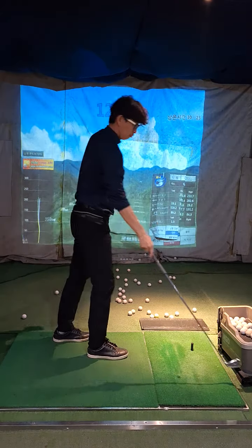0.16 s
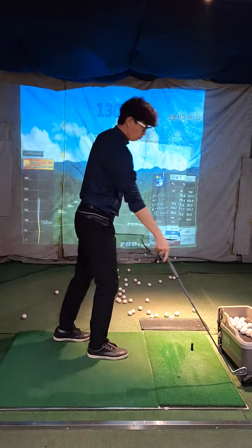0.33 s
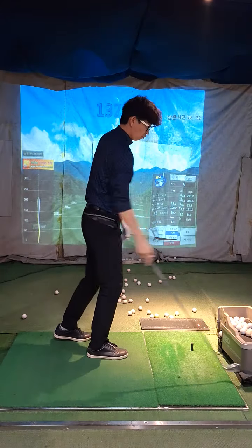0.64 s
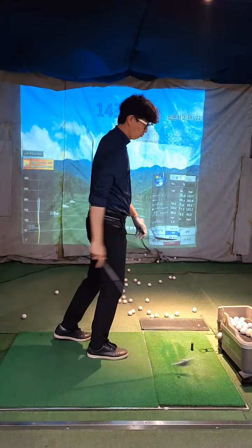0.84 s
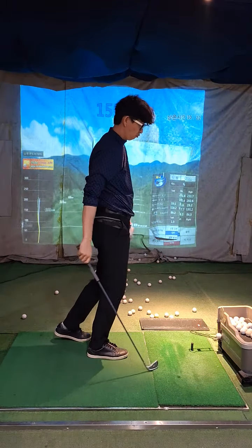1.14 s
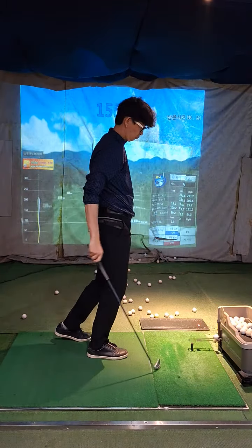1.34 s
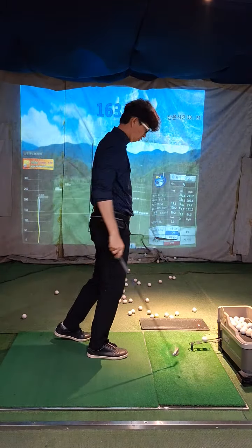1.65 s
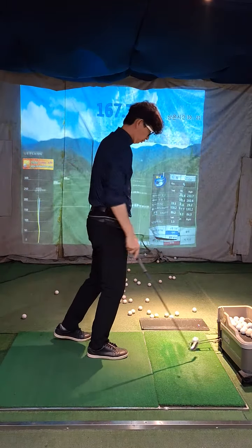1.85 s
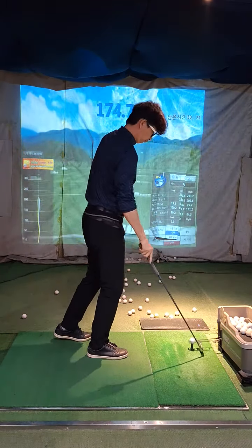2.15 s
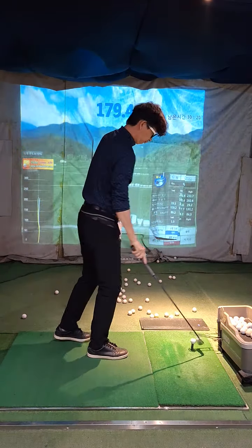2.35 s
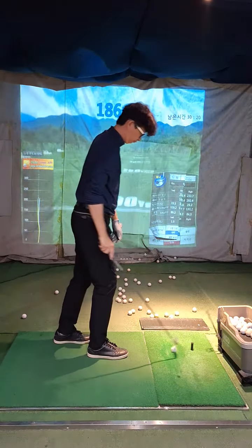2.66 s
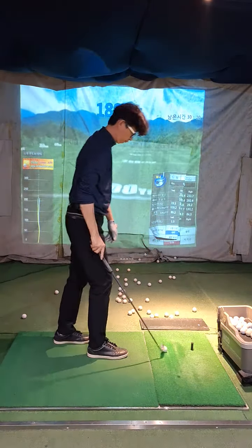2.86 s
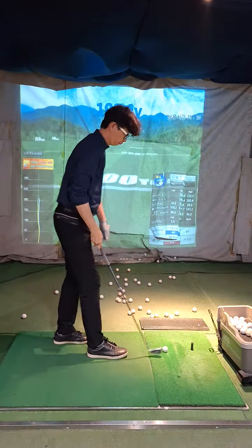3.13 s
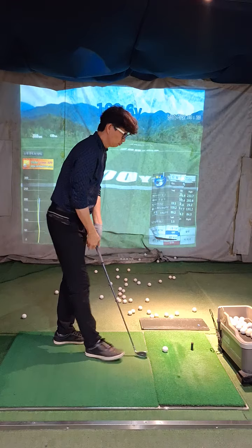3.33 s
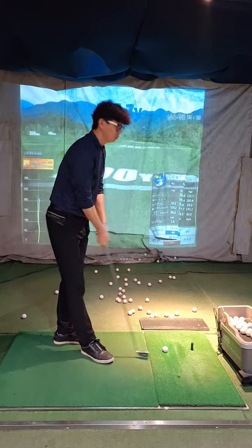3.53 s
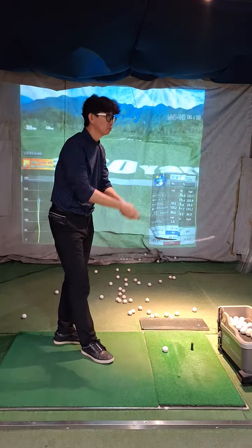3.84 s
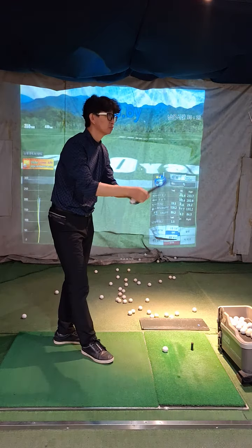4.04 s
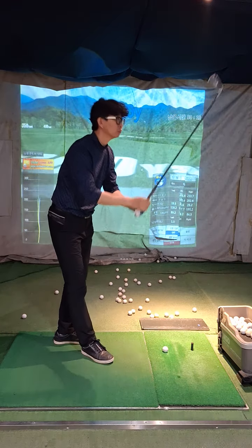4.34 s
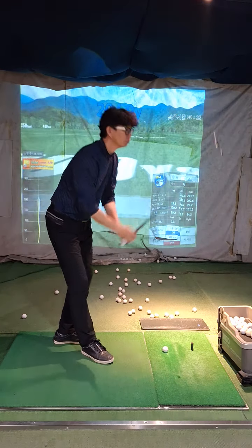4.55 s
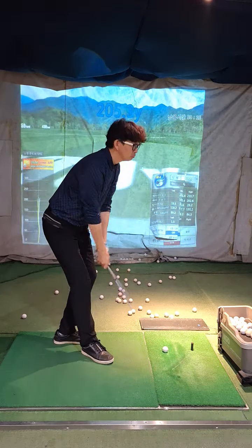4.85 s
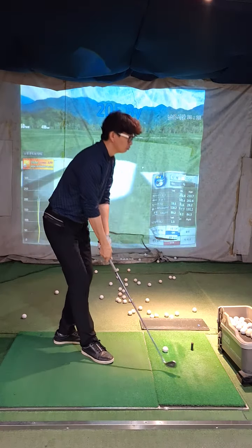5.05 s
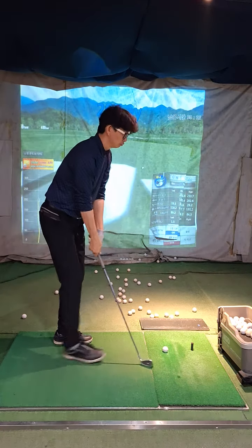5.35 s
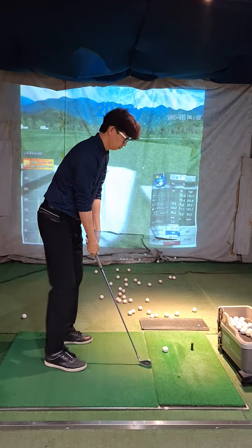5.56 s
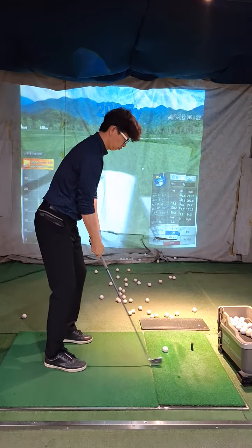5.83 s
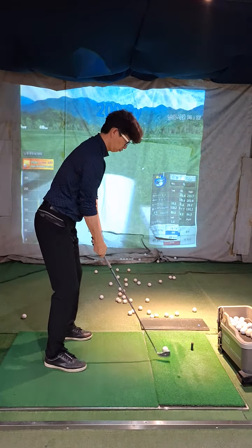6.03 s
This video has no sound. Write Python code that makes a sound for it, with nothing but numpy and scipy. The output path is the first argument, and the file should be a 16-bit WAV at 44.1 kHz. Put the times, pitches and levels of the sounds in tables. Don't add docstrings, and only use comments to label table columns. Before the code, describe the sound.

A low ventilation rumble with mains hum and a slowly rising motor drone fills a padded indoor golf bay throughout, heard by a stereo phone microphone with muted highs. At about 0.35 s hard balls crack together and pour into a plastic tray, strongest near 0.4 s, with a hollow boom and another knock at 0.55 s. Stragglers clack around 0.8 s and settle by 1.0 s. From 1.7 to 2.3 s a club head brushes turf in short, soft rasps with light taps. The drone swells towards 2.5 s; faint, narrow gear chatter runs from 2.2 to 3.3 s, with a sharp double clack at 2.87 s and a duller rattle at 3.33 s. A faint tick comes at 3.87 s, then mostly room tone. At 4.95 s the club thuds heavily onto the mat, fluttering rapidly, with a smaller knock at 5.1 s before hum and air remain to about 6 s.

```python
import sys
import numpy as np
from scipy import signal
from scipy.io import wavfile
from scipy.ndimage import uniform_filter1d

SR = 44100
rng = np.random.default_rng(int(sys.argv[2]) if len(sys.argv) > 2 else 0)


def boost(x):
    u = np.asarray(x, float) / 20
    return 10 ** u


def generate_wav(signal):
    frames = np.transpose(np.atleast_2d(signal))
    scaled = np.clip(frames, -1, 1) * 32767
    pcm = np.round(scaled).astype(np.int16)
    wavfile.write(sys.argv[1], SR, pcm)


N = 272977


def evened(x):
    return x / np.sqrt(np.mean(x ** 2) + 1e-20)


def read(points, hz):
    f, value = np.transpose(points)
    return np.interp(np.log(hz + 1), np.log(f + 1), value)


def curve(rows, edge=0.036):
    s, *columns = np.transpose(rows)
    t = np.arange(N) / SR
    gate = np.clip(np.minimum(t - s[0], s[-1] - t) / edge, 0, 1)
    return gate, [np.interp(t, s, c) for c in columns]


def colour(x, points, tilt_db=0.):
    hz = abs(np.fft.fftfreq(2048, 1 / SR))
    tilt = tilt_db * np.log2(np.clip(hz, 500, 9000) / 2000)
    log_gain = np.log(boost(np.maximum(read(points, hz), -100) + tilt))
    taps = np.fft.ifft(np.exp(np.conj(signal.hilbert(log_gain)))).real[:1024]
    return signal.oaconvolve(x, taps)[:len(x)]


def ring(x, hz, width):
    turn = np.exp(2j * np.pi * np.cumsum(hz * np.ones(len(x))) / SR)
    r = np.exp(-np.pi * width / SR)
    smooth = signal.lfilter([(1 - r) ** 2], [1, -2 * r, r ** 2], x * turn.conj())
    return 2 * (turn * smooth).real


def grains(per_s, spread_db):
    sign, chance, size = rng.standard_normal(N), rng.random(N), rng.exponential(1, N)
    return sign * (chance < per_s / SR) * boost(spread_db * np.minimum(size, 4))


def surge(peak_s, run_up, release_db_per_s):
    t = np.arange(N) / SR - peak_s
    return boost(np.maximum(np.minimum(30 * t / run_up, -release_db_per_s * t), -120))


def pan(x, db):
    return np.array([x * boost(db / 2), x * boost(-db / 2)])


def wide(a, b, share):
    return np.array([a + share * b, a - share * b]) / np.sqrt(1 + share ** 2)


def add(mix, s, sound):
    part = mix[:, round(s * SR):][:, :sound.shape[1]]
    part += sound[:, :part.shape[1]]


# pitch_hz, level_db [dB per Hz]
AIR_COLOUR = [(20, -34.5), (34, -29.5), (48, -8), (125, -5.5), (300, -16), (1940, -33.5), (4910, -52),
              (8500, -76)]
# time_s, level_db
VENT_LEVEL = [(0, -40), (1.0, -40.5), (1.4, -41.5), (2.1, -37), (2.7, -40), (3.5, -39), (4.901, -40.5),
              (6.19, -41.5)]
# pitch_hz, likeness [-1 to 1]
LIKENESS = [(60, 0.62), (140, 1), (320, 0.7), (740, 0.48), (1710, 0.2), (3960, 0.13), (9160, 0.1)]
# pitch_hz, left_minus_right_db
AIR_LEAN = [(60, 2.8), (200, 0.5), (500, 1.5), (1500, -2), (4000, 3.5), (9000, 13)]
# pitch_hz, width_hz, lift_db
DUCT_RINGS = [(246, 18, 6), (428, 81, 4)]
# time_s, lift_db
FLOOR_RUMBLES = [
    (.5, 9),
    (5.05, 10),
]


def air():
    frames, hz = N // 256 + 5, np.fft.rfftfreq(1024, 1 / SR)
    a, b, c, d, patches = rng.standard_normal((frames, 513, 5)).T
    patches = evened(uniform_filter1d(uniform_filter1d(patches, 10, 0), 14, 1))
    s, level_db = np.transpose(VENT_LEVEL)
    t = np.arange(frames) * 256 / SR
    rumble_s = 0.16
    rumble_db = sum(db * np.exp(-((t - at) / rumble_s) ** 2) for at, db in FLOOR_RUMBLES)
    duct_db = sum(db * np.exp(-((hz - f) / w) ** 2) for f, w, db in DUCT_RINGS)
    bass_share = 1 / (1 + (hz / 250) ** 2)
    swell_db = np.interp(t, s, level_db) + np.outer(bass_share, rumble_db) + duct_db[:, None]
    same = np.clip(read(LIKENESS, hz), -1, 1)[:, None]
    left = a + 1j * b
    z = np.array([left, same * left + np.sqrt(1 - same ** 2) * (c + 1j * d)])
    z *= boost(read(AIR_COLOUR, hz)[:, None] + 1.2 * patches + swell_db)
    z *= pan(0.71, read(AIR_LEAN, hz))[:, :, None]
    return boost(59.5) * signal.istft(z, nperseg=1024, noverlap=768)[1][:, :N] / 512


def fuzzy_tone(rows, start_hz, climb, width, steady):
    gate, (db,) = curve(rows, edge=0.043)
    hz = start_hz + climb * np.arange(N) / SR
    fuzz = evened(ring(rng.standard_normal(N), hz, width))
    tone = np.sqrt(2) * np.sin(2 * np.pi * np.cumsum(hz) / SR)
    return gate * boost(db) * (steady * tone + (1 - steady) * fuzz)


# time_s, level_db
HUM_LOUDNESS = [(-.1, -46), (2, -43), (3.0, -37.5), (3.6, -39), (4.2, -45), (5.2, -43), (6.3, -40)]
# time_s, level_db
DRONE_LOUDNESS = [(-.1, -38.5), (.8, -42), (1.3, -44), (2.0, -38.5), (2.5, -33), (2.85, -39.5),
                  (3.0, -44.5), (3.3, -41), (3.45, -48), (4.1, -52), (4.5, -43.5), (4.7, -62)]


def machines():
    hum = fuzzy_tone(HUM_LOUDNESS, start_hz=57.4, climb=.3, width=22, steady=0.74)
    drone = fuzzy_tone(DRONE_LOUDNESS, start_hz=109.85, climb=9.5, width=8.2, steady=0.82)
    return pan(hum + drone, 1.6)


# pitch_hz, fall_by_60_db_s
BAY_ECHO = [(100, 0.95), (200, 0.047), (400, 0.4), (1000, 0.35), (3000, 0.32), (6000, 0.32), (10000, 0.2)]


def bay(x, start=250):
    echoes = np.zeros((2, SR))
    slots = np.arange(start, SR - 20, 20)
    at = slots + rng.integers(0, 20, (2, len(slots)))
    np.put_along_axis(echoes, at, rng.choice([-1., 1.], at.shape), 1)
    hz, t, z = signal.stft(echoes, SR, nperseg=256)
    same = np.clip(read(LIKENESS, hz), 0, 1)[:, None]
    z[1] = same * z[0] + np.sqrt(1 - same ** 2) * z[1]
    tail = signal.istft(z * boost(-60 * t / read(BAY_ECHO, hz)[:, None]), SR, nperseg=256)[1]
    return signal.fftconvolve(x.mean(0)[None], tail / np.linalg.norm(tail[0]), axes=1)[:, :N]


# pitch_hz, width_hz
HOUSING_RINGS = [(3170, 170), (3520, 380), (3790, 220)]
# loudest_s, level_db, fade_db_per_s [either side]
HOUSING_SHIFT = [(3.12, -60.5, 13), (2.35, -63, 22), (2.75, -63, 8)]


def whine():
    start_s, end_s = 2.2, 3.34
    gate, (t,) = curve([(start_s, start_s), (end_s, end_s)], edge=0.034)
    chatter = grains(3800, 1.7)
    out = np.zeros(N)
    for (s, db, fade), (hz, width) in zip(HOUSING_SHIFT, HOUSING_RINGS):
        out += boost(db - fade * abs(t - s)) * evened(ring(chatter, hz, width))
    return gate * out


# start_s, peak_db, pitch_hz, width_hz, rattle_s
LIGHT_TAPS = [(1.728, -43, 4200, 900, .014), (1.735, -47.5, 3620, 500, 0.0097),
              (1.82, -48, 3400, 700, .015), (2.0115, -37.5, 3470, 550, 0.0067),
              (2.065, -45, 2150, 400, .02), (2.212, -48, 3700, 700, 0.011), (2.21, -46, 2400, 400, .015),
              (4.616, -48.5, 5270, 740, 0.017), (4.63, -55, 3900, 600, .03),
              (3.345, -41, 2600, 1500, 0.049), (3.335, -38, 1350, 900, .08), (.97, -33, 400, 180, .05),
              (5.098, -36, 1200, 700, .02), (4.951, -18, 690, 220, .035), (.84, -26, 440, 200, .05),
              (.553, -22, 620, 200, .025), (2.866, -37, 7500, 2500, .012)]


def taps():
    out, t = np.zeros((2, N)), np.arange(SR // 5) / SR
    for s, db, hz, width, length in LIGHT_TAPS:
        rattles = [ring(x * np.exp(-t / length), hz, width) for x in rng.standard_normal((2, len(t)))]
        gain = boost(db) / abs(rattles[0]).max()
        add(out, s, gain * wide(*rattles, 0.81) * pan(0.66, 5.5)[:, None])
    return out


# pitch_hz, level_db [dB per Hz]
TURF_COLOUR = [(1500, -19.5), (2200, 1), (2800, -5.5), (3600, -0.5), (4400, -16.5), (5200, -12.5),
               (6500, -20), (9500, -54)]
# peak_s, hiss_db, low_scuff_db, run_up_s
TURF_STROKES = [
    (1.734, -44.5, -67, .03),
    (1.846, -43.5, -47.5, 0.13),
    (2.012, -50.5, -44.5, 0.014),
    (2.07, -49, -51.5, 0.067),
    (2.135, -45.5, -50, 0.17),
    (2.214, -39, -51.5, .015),
    (2.262, -44, -39.5, .1),
]


def drags():
    landing_s, glide_hz_per_s = 4.968, 20000
    fibres = [grains(12000, 3.7) for side in range(2)]
    sole_hz = 5450 + glide_hz_per_s * np.clip(np.arange(N) / SR - landing_s, -.015, .015)
    hiss = wide(*(evened(colour(x, TURF_COLOUR)) for x in fibres), 0.52)
    scuff = wide(*(evened(ring(x, 1300, 1600)) for x in fibres), 0.52)
    iron = wide(*(evened(ring(x, sole_hz, 690)) for x in fibres), 0.52)
    out = np.zeros((2, N))
    for s, hiss_db, scuff_db, run_up in TURF_STROKES:
        stroke = boost(hiss_db - 13.0) * hiss + boost(scuff_db - 4.5) * scuff
        out += surge(s, run_up, release_db_per_s=497) * stroke
    landing = boost(-52) * (iron + 0.31 * hiss) + boost(-43 - 4.5) * scuff
    return out + surge(landing_s, run_up=.04, release_db_per_s=646) * landing


# time_s, force_db
BALL_POURS = [
    [(.33, -69), (.35, -31.5), (.385, -21.5), (.4, -17), (.445, -35.5), (.472, -27), (.545, -35.5),
     (.575, -46.5), (.724, -53.5)],
    [(.724, -58.5), (.79, -48), (.858, -40.5), (.93, -55.5), (.976, -53.5), (1.15, -82.5)],
]
# peak_s, boom_db, run_up_s
TRAY_SHAKES = [
    (0.558, -33.5, 0.035),
    (.86, -36.5, 0.092),
    (0.978, -43.5, 0.11),
    (2.1, -37.5, 0.25),
    (2.241, -34, 0.033),
    (2.885, -41, 0.065),
]
# pitch_hz, width_hz, level_db
TRAY_RINGS = [(156.7, 22, -2.5), (213, 42, 6.5), (313, 43, 3.5), (395.5, 77, 6.5), (503, 190, 1.5),
              (583, 130, 0.5), (697, 28, -9.5)]
# pitch_hz, level_db [dB per Hz]
CLICK_BODY = [(500, -38.5), (800, -6), (1200, 5.5), (1700, -5), (2200, 1.5), (3000, -11), (5000, -45)]
# pitch_hz, level_db [dB per Hz]
CLICK_EDGE = [(2000, -26), (3200, 5), (4200, 6), (5500, -2), (7500, -18), (9500, -25)]


def tumble():
    gate, (force_db,) = curve(sum(BALL_POURS, []), edge=0.0065)
    fall = 80 * np.arange(N) / SR
    push_db = np.where(gate > 0, -5.5 + 0.61 * force_db, -120)
    boom_db = np.maximum.accumulate(push_db + fall) - fall
    knocks = grains(1000, 1.82)
    shakes = sum(boost(db) * surge(s, run_up, 106) for s, db, run_up in TRAY_SHAKES)
    level = boost(boom_db) + shakes
    quiet_db = np.clip(20 * np.log10(level / level.max()), -40, 0)
    boom = np.zeros(N)
    for hz, width, db in TRAY_RINGS:
        dulling_db = .3 * quiet_db * np.log2(hz / 300)
        boom += boost(db - 13 + dulling_db) * evened(ring(knocks, hz, width))
    clicks = [grains(6000, 2.7) for side in range(2)]
    clatter = wide(*(evened(colour(x, CLICK_BODY)) for x in clicks), 0.65)
    crisp = wide(*(evened(colour(x, CLICK_EDGE)) for x in clicks), 0.65)
    top = boost(force_db - 3.0) * clatter + boost(-1 + 1.3 * force_db) * crisp
    return pan(level * boom, 1.5) + gate * top * pan(1.0, 1.5)[:, None]


# start_s, peak_db, brightness_db_per_octave, knock_db, rattle_s
CLACK_HITS = [(0.354, -26, 3.5, -16, 0.0063), (0.393, -10, 2.5, -15, 0.011),
              (0.4353, -16.5, -0.5, -31, 0.0059), (0.548, -19.5, -2.5, -3, 0.013),
              (0.783, -33, -4.5, 2, 0.014), (0.798, -30, -3.5, -0.5, 0.0087), (0.838, -24, -6, -3, 0.01),
              (1.733, -50, 4, -15, 0.0027), (2.011, -33, -3, 2.5, .002), (2.213, -52, -7, -11, .004),
              (2.807, -41, -3, -6, .006), (2.864, -21, 4.5, -7, 0.012), (2.875, -19.5, -4, -5.5, 0.0076),
              (3.869, -35, 2, -7, 0.026), (4.949, -18.5, -3, -27, 0.001), (4.9565, -26, -10.5, -27, 0.0012),
              (3.334, -29, -4, -13, 0.036), (5.095, -26.5, -8, -13.5, 0.0093)]
# pitch_hz, level_db [dB per Hz]
CLACK_COLOUR = [(700, -1.5), (1100, 3.5), (1700, 0.5), (2500, -3), (4000, -12), (5200, -11.5),
                (7000, -26.5), (9500, -40.5)]


def clacks():
    out, ticks, t = np.zeros((2, N)), np.zeros((2, N)), np.arange(SR // 5) / SR
    for s, db, tilt_db, knock_db, length in CLACK_HITS:
        decay = np.exp(-t / np.clip(length, .0005, .05))
        sources = np.vstack([t == 0, rng.standard_normal((2, len(t))) * decay])
        tick, *rattles = (evened(colour(x, CLACK_COLOUR, tilt_db))
                          + boost(knock_db) * evened(ring(x, 555, 140))
                          for x in sources)
        gain = boost(db) / abs(rattles[0]).max()
        add(out, s, gain * wide(*rattles, 0.47) * pan(0.87, 0)[:, None])
        add(ticks, s, gain * pan(tick, 0))
    return out, ticks


# centre_s, level_db, pitch_hz
PADDED_BLOWS = [
    (4.9498, 1.8, 390),
    (4.9566, -1.5, 320),
    (4.9566, -13, 180),
    (4.9625, -13, 600),
    (4.9712, -6.5, 340),
    (.4375, -4.5, 560),
    (.411, -10, 700),
    (5.092, -24, 170),
    (5.13, -24, 150),
]


def thuds():
    out, t = np.zeros((2, N)), np.arange(-500, 500) / SR
    flutter_hz = (327, 520, 430)
    flutter = [(4.979 + k * .0063, -15.5 - k * 1.5, flutter_hz[k % 3]) for k in range(16)]
    for k, (s, db, hz) in enumerate(PADDED_BLOWS + flutter):
        dip = -np.cos(2 * np.pi * hz * t - .55) * np.exp(-(t * hz * 1.85) ** 2)
        side_db = 1.1 if k < len(PADDED_BLOWS) else (-1) ** k * 9
        add(out, s + t[0], pan(boost(db) * dip, side_db))
    return out


def scene():
    steady = machines() + air()
    light = taps()
    rubbing = tumble() + drags() + pan(whine(), 0.0)
    hits, ticks = clacks()
    blows = thuds()
    room = bay(boost(-6.5) * rubbing + boost(0.13) * ticks + boost(-7.5) * blows)
    return rubbing + hits + blows + room + steady + light + boost(-0.5) * bay(light)


# pitch_hz, gain_db
MIC_RESPONSE = [(15, -3), (40, -0.04), (8000, -0.03), (9500, -14), (10500, -34.5), (12000, -51.5)]


def band_limit(x):
    return signal.sosfilt(signal.butter(12, 9760, fs=SR, output="sos"), x)


def record(dry):
    heard = np.array([colour(x, MIC_RESPONSE) for x in dry])
    return band_limit(heard)


dry = scene()
out = record(dry)
generate_wav(out)
```